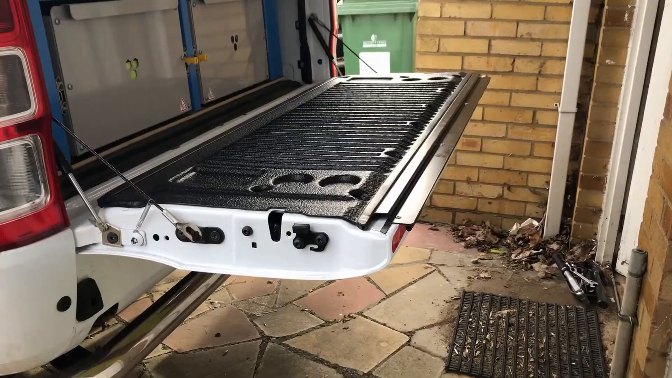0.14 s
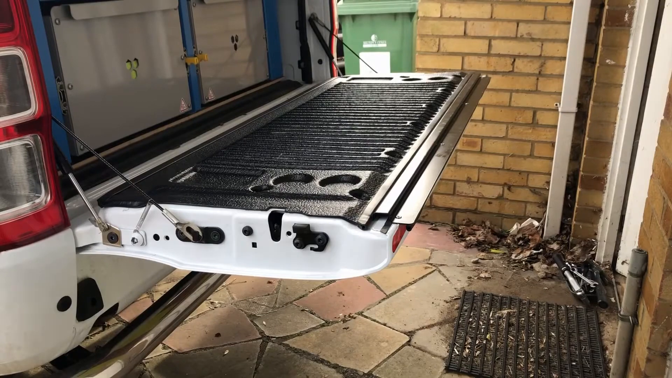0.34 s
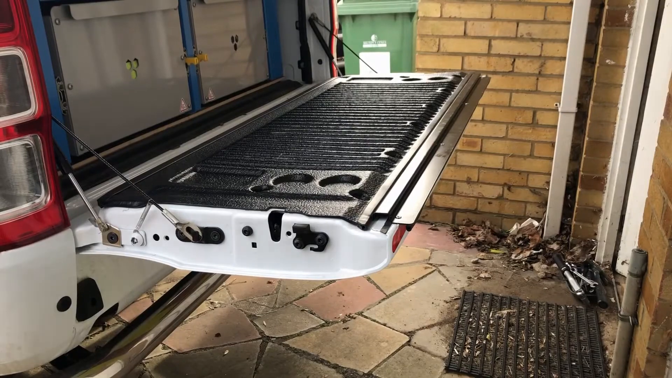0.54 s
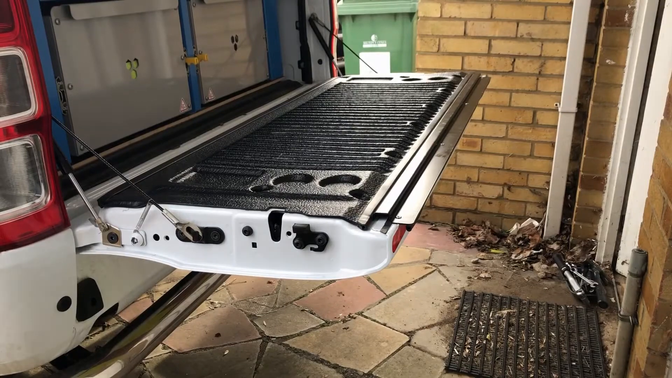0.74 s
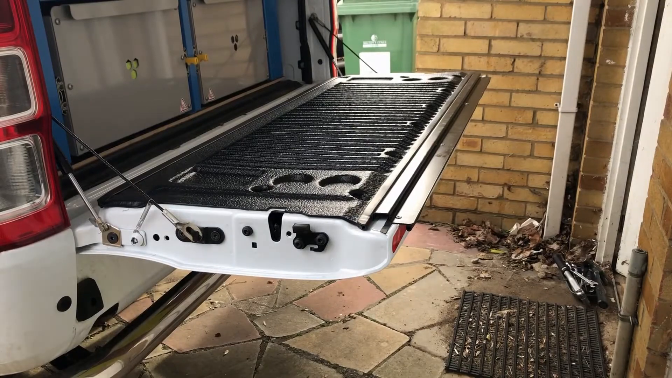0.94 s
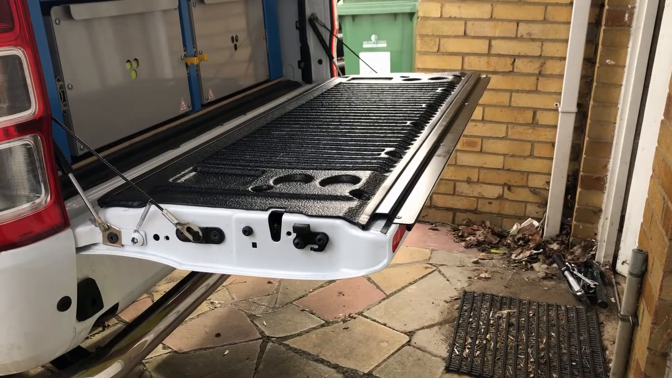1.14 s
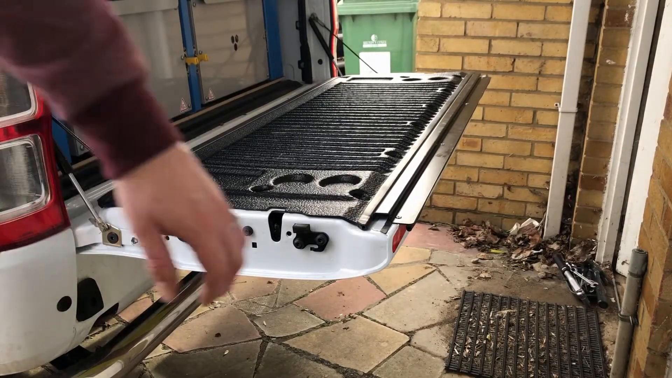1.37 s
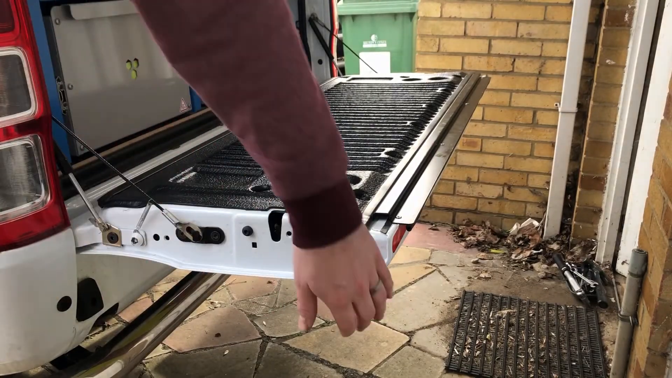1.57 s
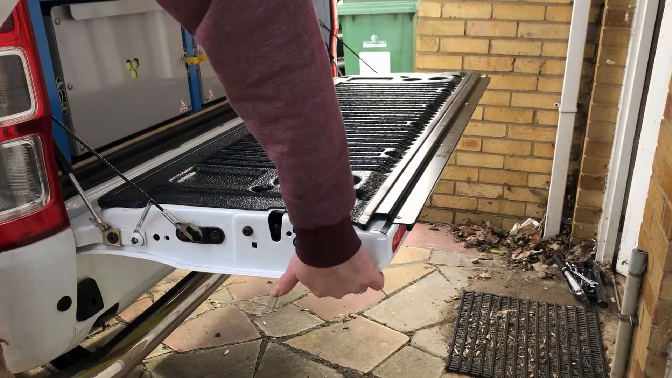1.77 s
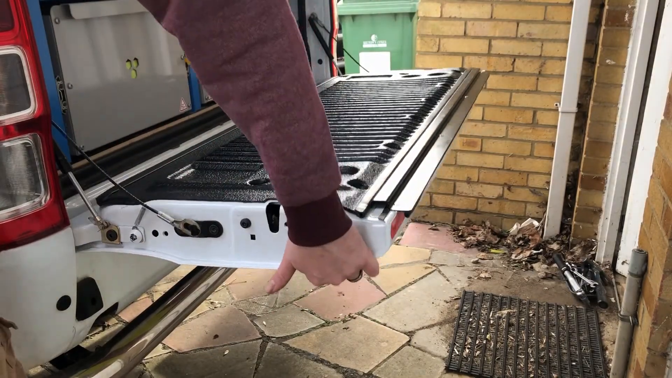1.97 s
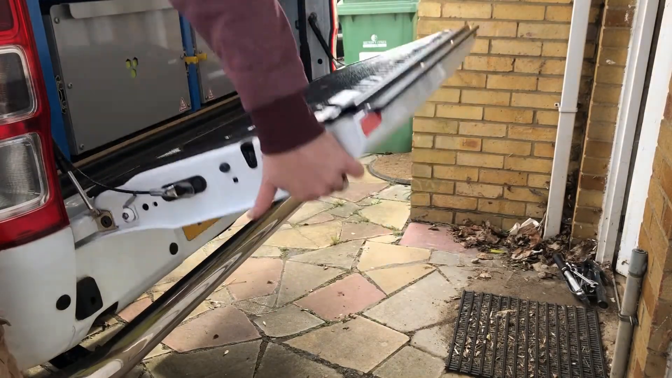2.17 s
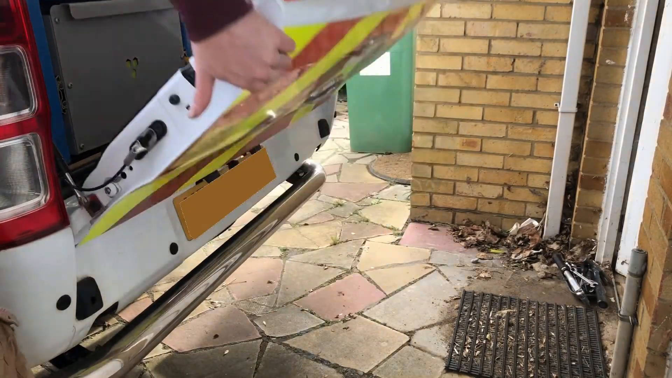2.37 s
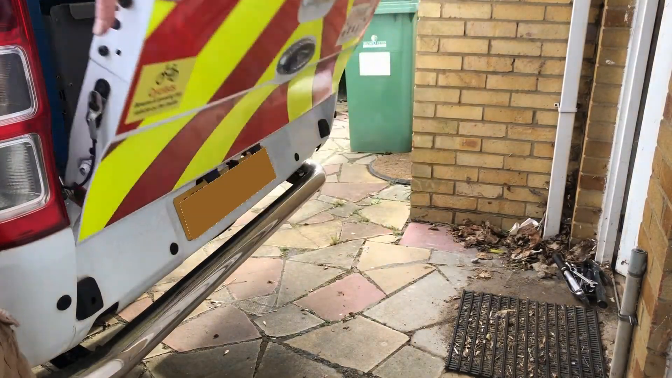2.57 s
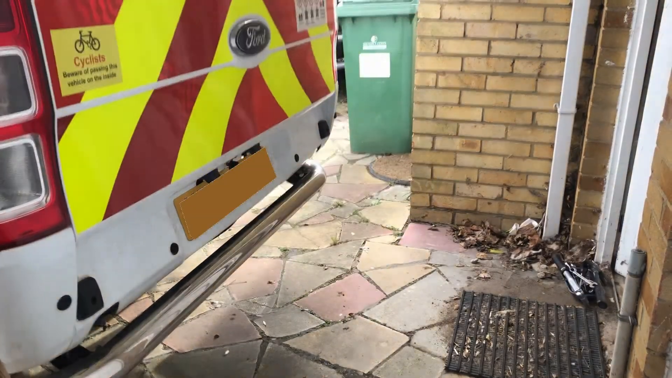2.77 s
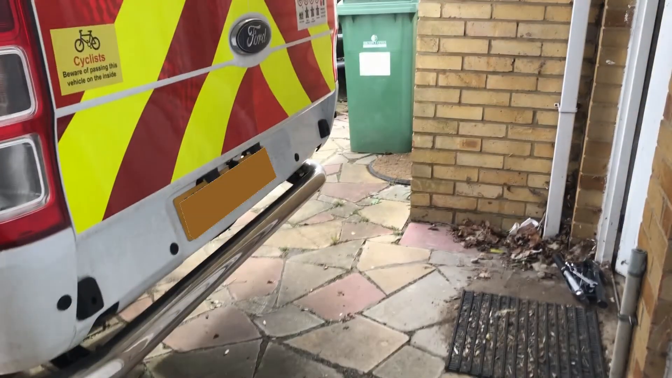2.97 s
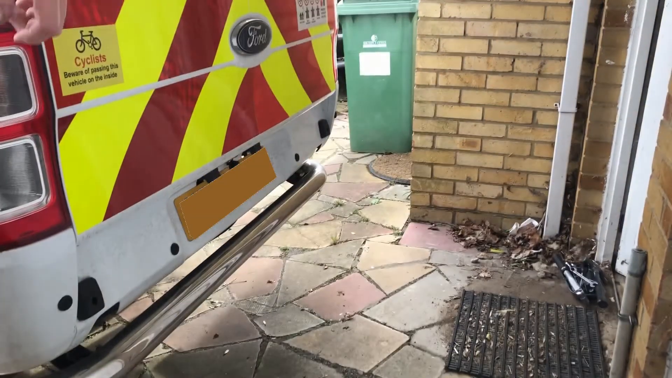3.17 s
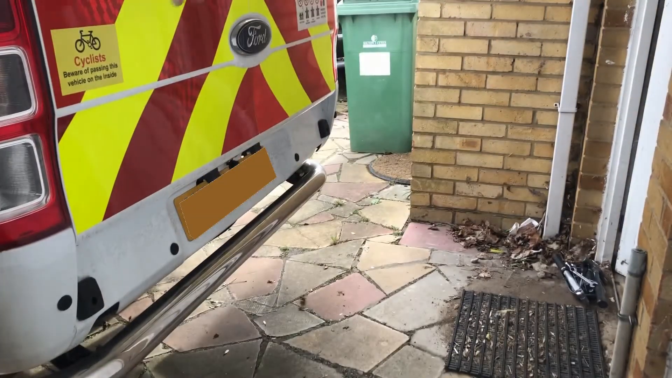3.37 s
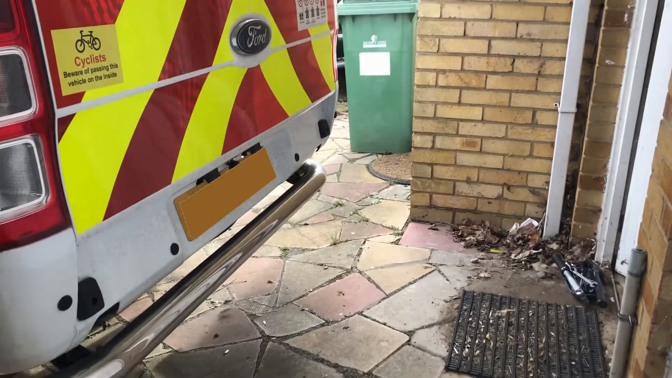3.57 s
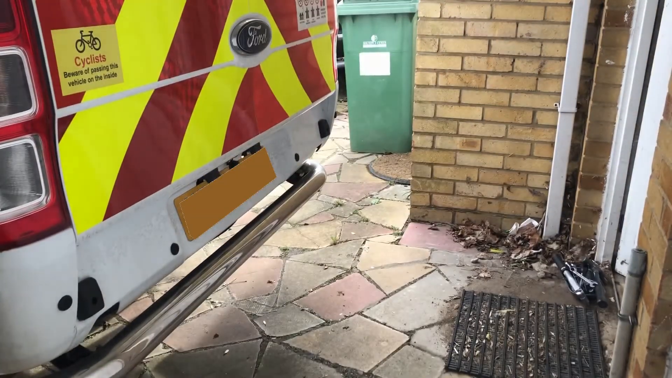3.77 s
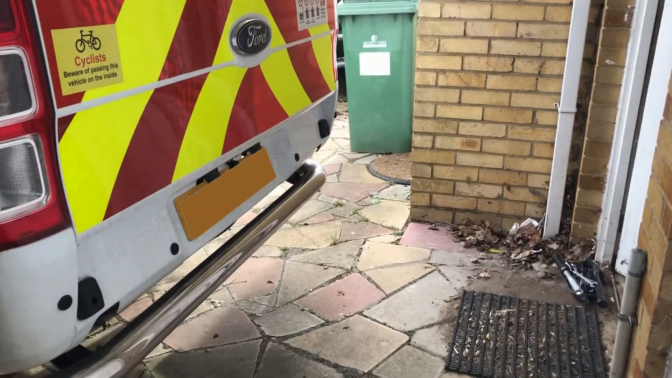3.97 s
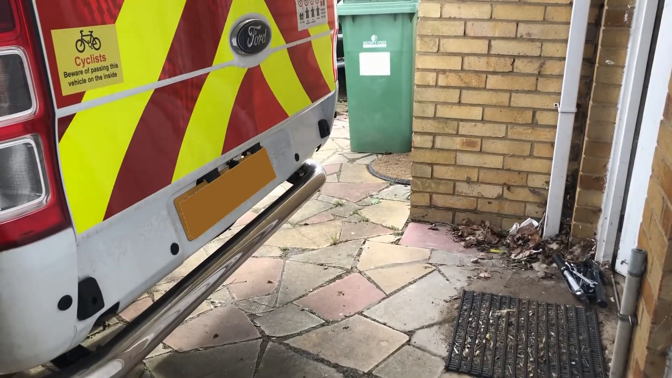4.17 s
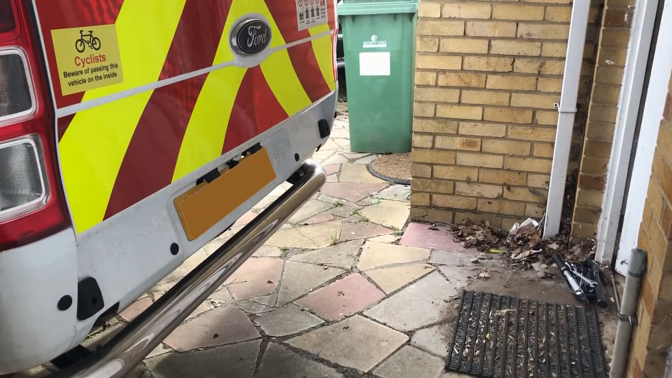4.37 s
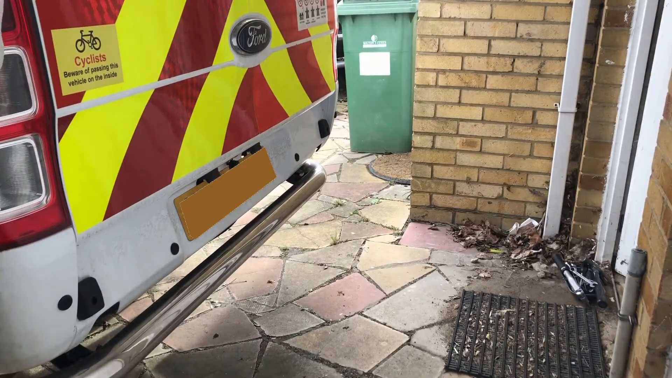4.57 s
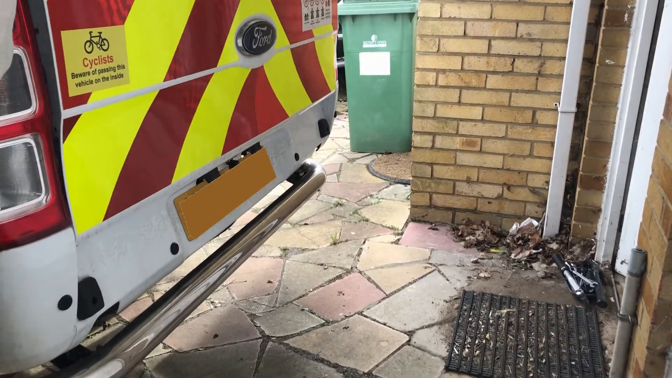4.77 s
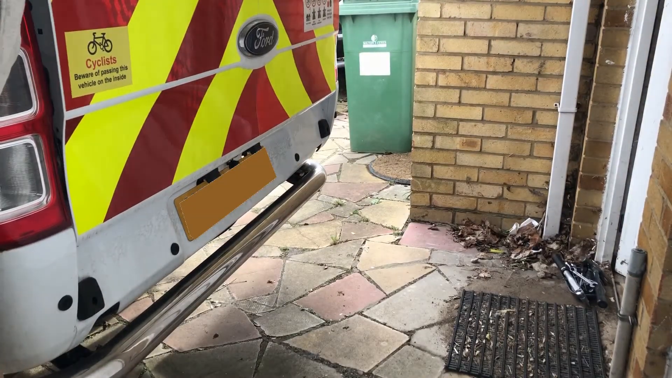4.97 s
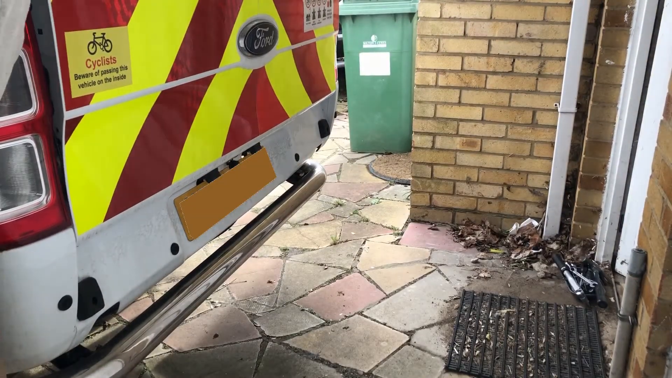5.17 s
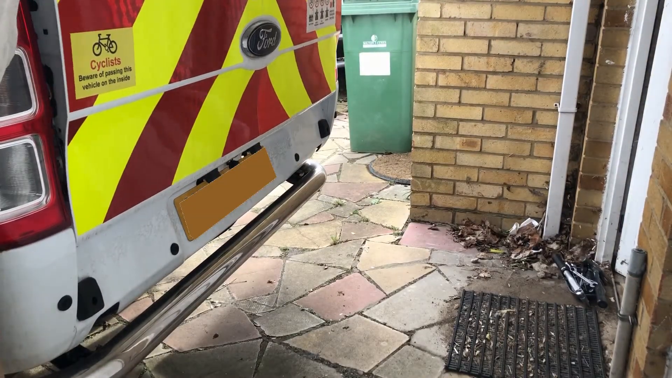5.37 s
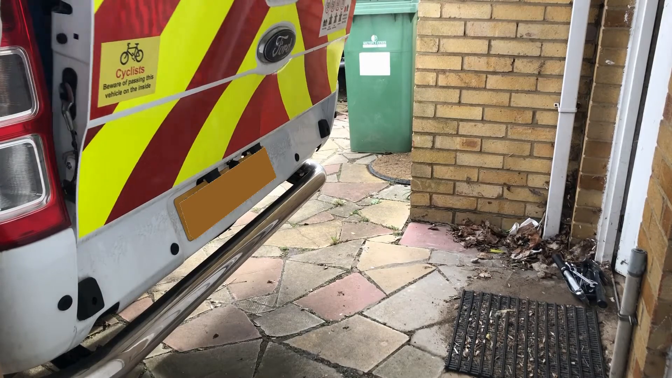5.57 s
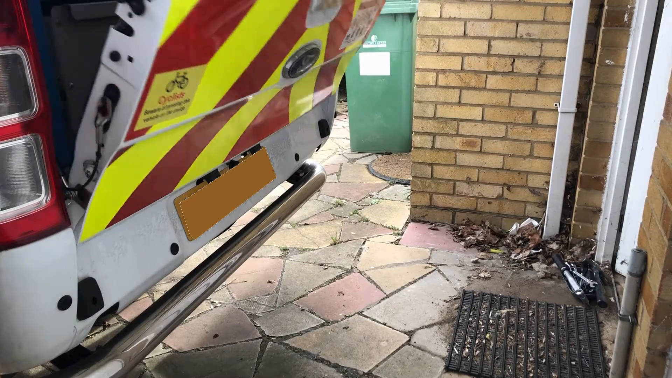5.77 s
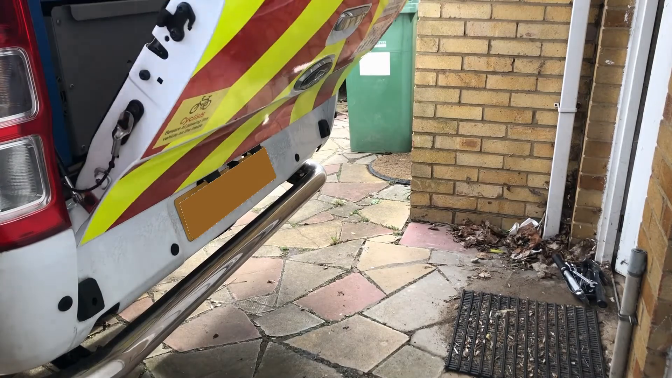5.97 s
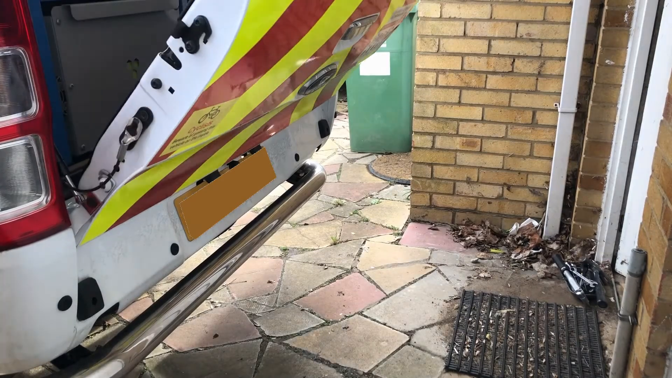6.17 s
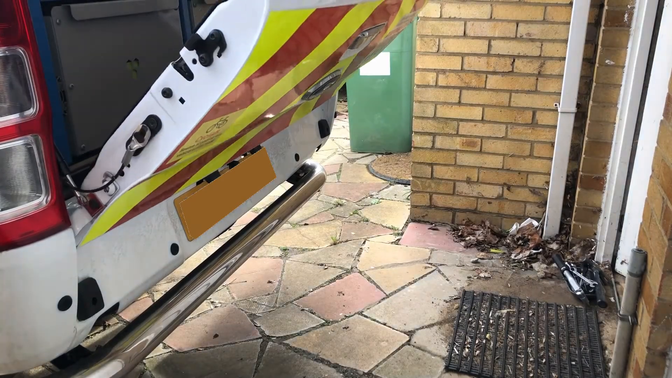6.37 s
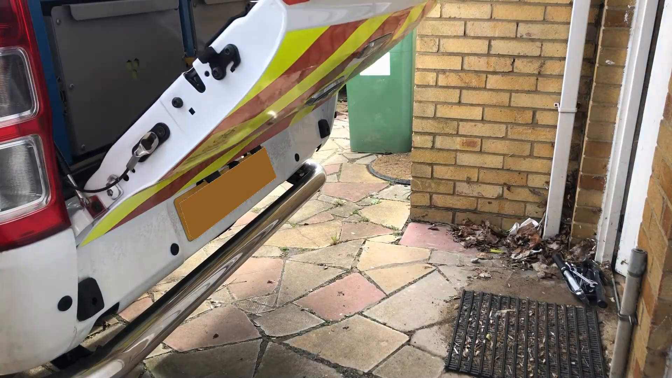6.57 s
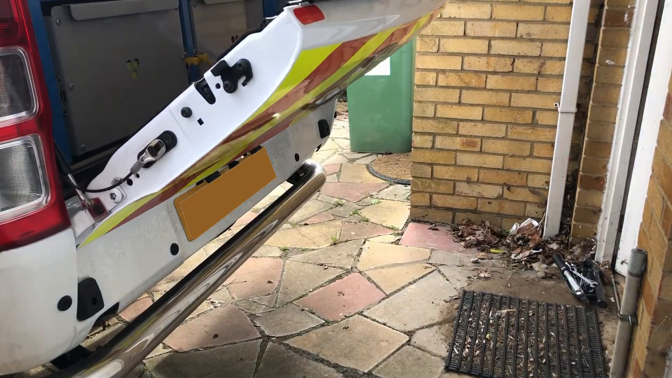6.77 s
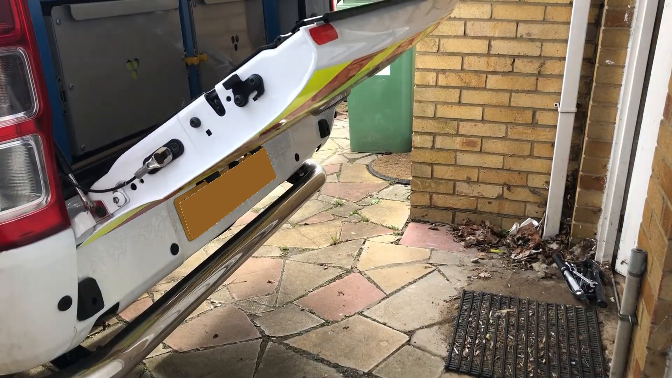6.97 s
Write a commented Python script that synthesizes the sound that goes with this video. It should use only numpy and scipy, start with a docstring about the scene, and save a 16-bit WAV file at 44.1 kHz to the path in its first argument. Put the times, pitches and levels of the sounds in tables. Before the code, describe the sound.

Quiet yard rustles and a small clink, a short grainy hinge rub, a booming steel tailgate slam, then a sharp double clunk of release.

```python
"""A pickup's steel tailgate is gripped, swung up and slammed in a brick-walled yard.
Two seconds later the handle is pulled, the latches spring open with two clunks and the gate is eased down.
Impulses ring tuned modes of the gate and latch parts amid half-octave noise for the crowded ones.
Light knocks and soft footfalls lie around them; shaped noise makes scuffing shoes, rustling sleeves,
hinges, squeaks and a rattle, with echoes from close hard surfaces, over a quiet outdoor rumble."""
import sys
import numpy as np
from scipy import signal
from scipy.fft import rfft, irfft, next_fast_len
from scipy.io import wavfile
from scipy.ndimage import uniform_filter1d

SR = 44100
rng = np.random.default_rng(int(sys.argv[2]) if len(sys.argv) > 2 else 0)


def log_audio(samples):
    """Write samples as a 16-bit WAV file to the path given in sys.argv[1]."""
    # one column per channel
    frames = np.atleast_2d(samples).T
    # limit to full scale, then quantise
    limited = np.clip(frames, -1, 1)
    pcm = np.round(limited * 32767).astype(np.int16)
    wavfile.write(sys.argv[1], SR, pcm)


N = 310067
TIME_S = np.arange(N) / SR

# the gate meets its stops and rebounds; the more of it moves, the deeper the blow reaches:
# start_s, drive_db at 1 kHz before colour, hardness_db_per_octave, depth_octaves below 1 kHz
BLOWS = [(2.774, -33, -3.5, 1.4), (2.801, -18.5, 0, .5), (2.823, -17, -2, 2.5), (2.837, -18, -3, 4.6),
         (2.885, -20, -4, 3.6), (2.969, -36.5, -3, 1.4), (4.769, -15, -3.5, 2.2), (4.794, -20, -3, 3.66),
         (4.920, -19.5, -2.2, 2.2), (4.943, -34.5, -9.5, 2.65)]


def from_db(db):
    """Amplitude ratio of a level in dB."""
    return 10 ** (np.asarray(db) / 20)


def rms_one(x):
    """Scales a signal to rms 1."""
    return x / np.sqrt(np.mean(x ** 2) + 1e-20)


def at_hz(points, hz):
    """Reads (Hz, value) rows on a log-frequency axis."""
    known_hz, values = np.transpose(points)
    return np.interp(np.log(hz), np.log(known_hz), values)


def column(rows, index):
    """One column of an event table."""
    return np.array(rows)[:, index]


def swell(rows):
    """Gain from a (s, dB) curve; silent outside it."""
    times_s, level_db = np.transpose(rows)
    return from_db(np.interp(TIME_S, times_s, level_db, left=-np.inf, right=-np.inf))


def stroke(peak_s, rise_s, fall_s):
    """Envelope of one event: it builds smoothly and trails off exponentially."""
    since_s = TIME_S - peak_s
    decay = np.where(since_s < 0, (since_s / rise_s) ** 2, since_s / fall_s)
    return np.exp(-decay.clip(max=20))


def flicker(per_s, depth_db):
    """Random gain of rms 1, gliding to a new value per_s times a second."""
    steps = rng.standard_normal(N // 8)
    level_db = depth_db * np.interp(TIME_S * per_s, np.arange(len(steps)), steps)
    return rms_one(from_db(level_db))


def noise(spectrum):
    """Noise of the given colour that falls away below its lowest point; rms 1."""
    size = next_fast_len(N)
    hz = np.maximum(np.fft.rfftfreq(size, 1 / SR), 1)
    low_cut = np.minimum(hz / spectrum[0][0], 1) ** 2
    gain = from_db(at_hz(spectrum, hz)) * low_cut
    white = rng.standard_normal(size)
    return rms_one(irfft(rfft(white) * gain, size)[:N])


def clicks(times_s, heights):
    """One impulse for each contact."""
    out = np.full(N, 1e-18)   # tiny floor keeps later square roots valid
    out[np.round(times_s * SR).astype(int)] += heights
    return out


def ring(x, hz, t60_s):
    """Two-pole resonator: a unit click sets a decaying sine of height 1 ringing."""
    radius = np.exp(-np.log(1000) / (t60_s * SR))
    angle = 2 * np.pi * hz / SR
    return signal.lfilter([0, np.sin(angle)], [1, -2 * radius * np.cos(angle), radius * radius], x)


def dying(energy, t60_s):
    """Energy put in by impulses leaks away exponentially."""
    return signal.lfilter([1], [1, -np.exp(-2 * np.log(1000) / (t60_s * SR))], energy)


def contact(hits, colour):
    """Drive in dB of each hit at a frequency: the colour of its kind, tilted by its hardness."""
    drive_db, hardness = column(hits, 1), column(hits, 2)
    return lambda hz: drive_db + hardness * np.log2(hz / 1000) + at_hz(colour, hz)


def clatter(hits, drive, ring_scale, crack_db, crack_t60_s, bass_db, rattle_db, build_cycles):
    """Crowded modes as half-octave noise: a brief crack, the ring, then the yard's faint tail."""
    # ring time of the crowded sheet-metal modes, before ring_scale: pitch_hz, t60_s
    ring_time = [(40, 0.17), (150, 0.21), (400, 0.1), (1000, 0.18), (3000, 0.18), (7000, 0.14),
                 (15000, 0.08)]
    # late reverberation of yard and load bed against that ring: pitch_hz, level_db
    yard = [(40, -17.5), (150, -21.5), (500, -29), (2000, -35.5), (12000, -55.5)]
    times_s, out = column(hits, 0), np.zeros(N)
    edges_hz = np.geomspace(32, 17000, 20)
    white = rng.standard_normal((2, N))
    for k, (low_hz, high_hz) in enumerate(zip(edges_hz, edges_hz[1:])):
        hz = np.sqrt(low_hz * high_hz)
        band_pass = signal.butter(2, [low_hz, high_hz], "band", fs=SR, output="sos")
        band = rms_one(signal.sosfilt(band_pass, white[k % 2]))
        bass = 1 / (1 + (hz / 450) ** 2)   # low down the modes are sparse and the crack vanishes
        struck = clicks(times_s, from_db(drive(hz)) ** 2)
        crack = dying(struck, crack_t60_s) * (from_db(crack_db) ** 2 * (1 - bass))
        body = dying(struck, ring_scale * at_hz(ring_time, hz)) * from_db(bass_db * bass) ** 2
        tail = dying(struck, 1.0) * from_db(at_hz(yard, hz)) ** 2
        inertia = np.exp(-hz / (build_cycles * SR))   # low bands get going more slowly
        envelope = signal.lfilter([1 - inertia], [1, -inertia], np.sqrt(crack + body + tail))
        out += band * envelope
    return out * flicker(per_s=530, depth_db=rattle_db)


def outdoors():
    """A quiet, nearly steady distant rumble: dark noise with slight random level changes."""
    # colour of the open air: pitch_hz, density_db_per_hz
    air = [(15, -22.5), (25, -9), (70, 1), (242, -3), (309, -6), (754, -15), (1160, -18), (1370, -20),
           (2220, -27.5), (2990, -29.5), (6920, -40), (11000, -45), (16000, -40.5)]
    air_db = -49
    level_changes = flicker(per_s=8, depth_db=.6)
    return from_db(air_db) * noise(air) * level_changes


def walls(x):
    """Close hard surfaces throw back the upper range and comb its colour."""
    # echoes from the paving, the truck's side and the brick wall: delay_s, gain
    echoes = [(.0037, 0.058), (.0083, -0.2), (0.0137, .24), (0.023, -0.09)]
    echo_above_hz = 3300
    bright = signal.sosfilt(signal.butter(1, echo_above_hz, "high", fs=SR, output="sos"), x)
    return x + sum(gain * np.pad(bright, (round(delay_s * SR), 0))[:N] for delay_s, gain in echoes)


def rustling():
    """Cloth and soles slip in tiny catches: a dull rub and a bright swish."""
    # colours of the rub and the swish: pitch_hz, density_db_per_hz
    rub_colour = [(500, -5), (1300, -0.5), (2400, 0.5), (4200, -1), (6500, -4), (12000, -58)]
    swish_colour = [(2000, -14.5), (4500, 1.5), (7000, 4.5), (10000, 1.5), (15500, -2.5)]
    # soles scuff on the paving: peak_s, swish_db, fall_s
    scuffs = [(0.149, -53.5, 0.019), (0.504, -42.5, 0.029), (1.31, -53, 0.055), (2.63, -34, 0.046),
              (3.483, -43, 0.017), (3.977, -48, 0.018), (4.045, -48, 0.031), (4.225, -49, 0.031),
              (5.775, -53, 0.029), (6.533, -46.5, 0.044)]
    # a sleeve brushes past: peak_s, rub_db
    brushes = [(.44, -49.5), (1.14, -57.5), (1.52, -58), (1.61, -54.5), (2.53, -51.5), (3.68, -52.5),
               (3.774, -47.5), (5.39, -53), (5.45, -60.5), (5.84, -51), (5.9, -47), (6.785, -50)]
    # faint rustle of clothes between the clunks, one curve per spell: time_s, drive_db
    rustle = [
        [(0.0, -64.5), (0.43, -66.5), (0.59, -56), (0.92, -59.5), (1.64, -61), (2.45, -54.5)],
        [(3.1, -56.5), (3.254, -57.5), (3.688, -58.5), (3.822, -63), (4.578, -62.5), (4.7, -62)],
        [(5.15, -66), (5.684, -65), (5.818, -70), (5.916, -61.5), (6.844, -65), (7.0, -61)],
    ]
    scuff_rise_share, scuff_rub_db = 0.54, -6.5   # rise / fall; rub against swish
    brush_rise_s, brush_fall_s, brush_swish_db = 0.028, 0.035, -2
    still_db = -72   # at this level the clothes are at rest
    clothes_rub_db, clothes_swish_db = -1, -2.5

    soles = sum(from_db(db) * stroke(peak_s, scuff_rise_share * fall_s, fall_s)
                for peak_s, db, fall_s in scuffs)
    sleeves = sum(from_db(db) * stroke(peak_s, brush_rise_s, brush_fall_s) for peak_s, db in brushes)
    clothes = np.maximum(swell(np.vstack(rustle)) - from_db(still_db), 0)
    # independent rubbings add in power
    rub = np.linalg.norm(
        [from_db(scuff_rub_db) * soles, sleeves, from_db(clothes_rub_db) * clothes], axis=0)
    swish = np.linalg.norm(
        [soles, from_db(brush_swish_db) * sleeves, from_db(clothes_swish_db) * clothes], axis=0)
    return (rub * noise(rub_colour) + swish * noise(swish_colour)) * flicker(per_s=540, depth_db=2.0)


def footfalls():
    """Dull thuds, all of one colour: noise under a smoothed, dying energy."""
    # soft footfalls: start_s, drive_db
    steps = [(.12, -46.5), (.16, -44), (.238, -41), (.385, -45), (.582, -46.5), (.725, -46.5),
             (5.325, -43.5), (5.875, -38.5)]
    # colour of the thuds: pitch_hz, density_db
    step_colour = [(40, 3), (170, 4), (500, -21), (1500, -93), (11000, -44)]
    struck = clicks(column(steps, 0), from_db(column(steps, 1)) ** 2)
    thuds = dying(struck, t60_s=.28)
    envelope = np.sqrt(uniform_filter1d(thuds, size=400).clip(min=0))
    return from_db(5.5) * envelope * noise(step_colour)


def squeaks_and_rattle():
    """Resonators turn white noise into bands, narrow or broad, each under its own envelope."""
    # faint squeaks, a broad clank at 1.775 s, a gritty rattle at 5.901 s:
    # peak_s, rise_s, fall_s, pitch_hz, width_hz, level_db
    bands = [(.52, 0.064, 0.37, 1257, 49.7, -53.5), (1.775, 0.039, 0.092, 1750, 600, -39.5),
             (5.44, 0.085, 0.074, 510, 111, -45.5), (5.455, 0.016, 0.019, 2300, 250, -49.5),
             (5.901, 0.027, 0.05, 4530, 1520, -45), (6.786, .02, 0.067, 1120, 230, -47)]
    white = rng.standard_normal(N)
    out = 0
    for peak_s, rise_s, fall_s, hz, width_hz, db in bands:
        t60_s = np.log(1000) / (np.pi * width_hz)
        band = rms_one(ring(white, hz, t60_s))
        out = out + from_db(db) * stroke(peak_s, rise_s, fall_s) * band
    return out


def hinges():
    """Grainy friction of the pivots as the gate rises."""
    # the hinges rub while the gate swings: time_s, level_db
    swing = [(2.1, -68), (2.17, -36.5), (2.25, -37), (2.34, -40), (2.41, -56.5), (2.6, -81), (2.68, -41),
             (2.76, -43.5), (2.8, -62)]
    # colour of the rub: pitch_hz, density_db_per_hz
    hinge_colour = [(100, -14.5), (200, -2.5), (400, 5.5), (650, -2), (1400, -1), (1900, -5.5),
                    (2450, -1.5), (4500, -11), (9000, -20.5)]
    return swell(swing) * noise(hinge_colour) * flicker(per_s=250, depth_db=1.0)


def handling():
    """Light, damped knocks on the body."""
    # light knocks on the truck's body: start_s, drive_db at 1 kHz before colour, hardness_db_per_octave
    knocks = [(.982, -54, -4), (1.036, -59, -3.5), (2.022, -53, -4.5), (3.451, -49, -1),
              (4.501, -49.5, 0.5), (4.525, -58, -6)]
    # colour of the knocks: pitch_hz, gain_db
    knock_colour = [(40, -36), (150, 3), (500, 9.5), (1500, 0.5), (4200, -3.5), (11000, 0)]
    return clatter(knocks, contact(knocks, knock_colour), ring_scale=1.24, crack_db=-4.0,
                   crack_t60_s=.014, bass_db=-0.5, rattle_db=1.5, build_cycles=0.91)


def hardware():
    """Loose latch parts tick sharply and ring on."""
    # loose latch parts clink and the pawl snaps back:
    # start_s, drive_db at 1 kHz before colour, hardness_db_per_octave, ring_drive_db
    clinks = [(.497, -57, -6, -64), (1.7705, -48.5, 3, -31.5), (1.783, -61, 6.5, -57),
              (1.927, -64, -3, -48), (1.9945, -47, 0.8, -42), (2.563, -65, 6, -67),
              (2.608, -65.5, 6, -59.5), (4.8974, -25.5, 2.1, -25.5), (5.608, -46, -3, -50)]
    # modes of the latch parts: pitch_hz, gain_db, t60_s
    part_modes = [(1580, 0, .22), (1655, -2, .22), (3047, -7, .15), (3585, -5, .15), (4484, -13, .16),
                  (5920, -9, .14), (6213, -11, .14)]
    # colour of the ticks: pitch_hz, gain_db
    clink_colour = [(40, -21.5), (150, -11.5), (500, 0.5), (1500, -1.5), (4500, 7.5), (11000, -6.5)]
    touches = clicks(column(clinks, 0), from_db(column(clinks, 3)))
    rings = sum(from_db(db) * ring(touches, hz, t60_s) for hz, db, t60_s in part_modes)
    ticks = clatter(clinks, contact(clinks, clink_colour), ring_scale=1.15, crack_db=13.5,
                    crack_t60_s=0.0091, bass_db=4, rattle_db=2.0, build_cycles=2.2)
    return rings + ticks


def blow_drive(hz):
    """Like a contact, but below its depth a blow moves the steel less and less."""
    # colour of the blows: pitch_hz, gain_db
    blow_colour = [(40, -5), (150, 1.5), (500, 3.5), (1500, -2), (4200, -3.5), (11000, 3)]
    bass_loss_db_per_octave = 14.5   # below a blow's depth
    _, drive_db, hardness, depth_octaves = np.transpose(BLOWS)
    octave = np.log2(hz / 1000)
    reached = np.maximum(octave, -depth_octaves)
    bass_loss_db = bass_loss_db_per_octave * (reached - octave)
    return drive_db + hardness * reached - bass_loss_db + at_hz(blow_colour, hz)


def tailgate():
    """Every blow and latch rings the gate's strong modes, each a little differently, amid steel clatter."""
    # modes of the gate and the load bed: pitch_hz, gain_db, t60_s
    gate = [(38, 1.5, .28), (50, -5, .25), (104, -10, .27), (137, -16, .22), (164, -8, .28), (173, -1, .36),
            (185, -6, .17), (228, -16, .2), (372, -16, .24), (420, -7, .3), (513, -7, .2), (244, -13, .65),
            (303, -19, .5), (563, -30, .9), (752, -8, .27), (843, -8, .24), (1140, -11, .14),
            (1288, -7, .16), (1360, -9, .12), (2075, -10, .16), (3063, -11, .15), (3675, -10, .15),
            (4492, -17, .16), (5110, -8, .07), (6238, -9, .12), (6560, -13, .1)]
    # the latches catch in the slam and spring open in the release:
    # start_s, drive_db at 1 kHz before colour, hardness_db_per_octave
    latches = [(2.746, -31, 0.6), (2.7891, -23.5, 1), (4.7502, -18.5, -1.2), (4.755, -17.5, -1.5),
               (4.8974, -22.5, -0.3)]
    # colour of the latches: pitch_hz, gain_db
    latch_colour = [(40, -30), (150, -8), (500, -.5), (1600, -3.5), (4000, -4.5), (11000, -1)]
    times_s = np.append(column(BLOWS, 0), column(latches, 0))
    latch_drive = contact(latches, latch_colour)
    chance_db = rng.normal(0, 0.53, (len(times_s), len(gate)))
    modes = 0
    for k, (hz, mode_db, t60_s) in enumerate(gate):
        drive_db = np.append(blow_drive(hz), latch_drive(hz))
        push = from_db(drive_db + mode_db + chance_db[:, k])
        modes = modes + (-1) ** k * ring(clicks(times_s, push), hz, t60_s)   # alternating polarity
    panel_clatter = clatter(BLOWS, blow_drive, ring_scale=1.455, crack_db=-1, crack_t60_s=0.017,
                            bass_db=-7, rattle_db=-1.0, build_cycles=0.68)
    latch_clatter = clatter(latches, latch_drive, ring_scale=0.67, crack_db=5, crack_t60_s=0.039,
                            bass_db=-1, rattle_db=2.1, build_cycles=1.0)
    return modes + from_db(-2.5) * (panel_clatter + latch_clatter)


def scene():
    """Everything near the truck sounds between the yard's walls, over the distant rumble."""
    near = tailgate() + handling() + hardware() + footfalls() + rustling() + hinges() + squeaks_and_rattle()
    return (walls(near) + outdoors())[None]


def record(dry):
    """Soft saturation rounds the loudest peaks and a steep low-pass cuts the top."""
    ceiling, cutoff_hz = .92, 16000
    rounded = ceiling * np.tanh(dry / ceiling)
    return signal.sosfilt(signal.ellip(12, .1, 80, cutoff_hz, fs=SR, output="sos"), rounded)


dry = scene()
out = record(dry)
log_audio(out)
```